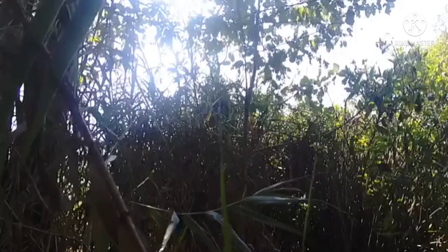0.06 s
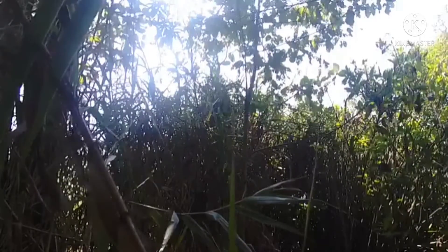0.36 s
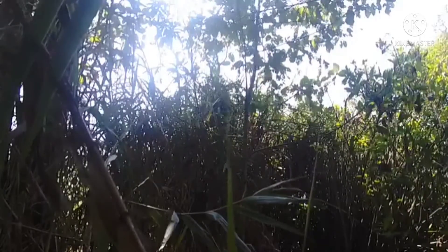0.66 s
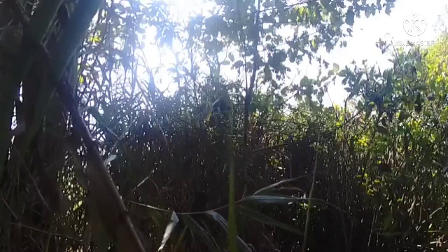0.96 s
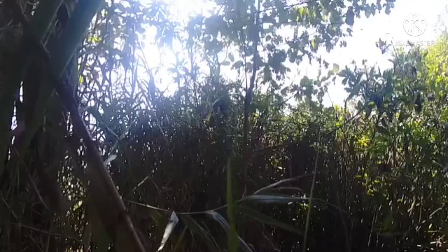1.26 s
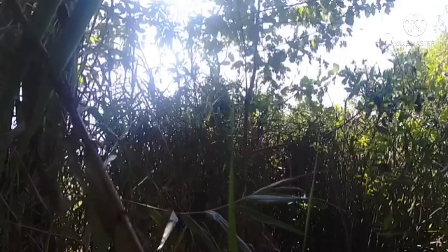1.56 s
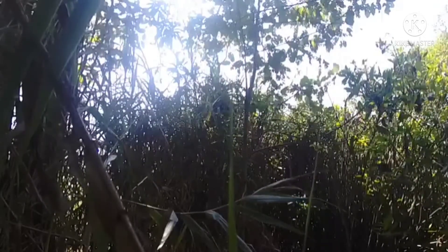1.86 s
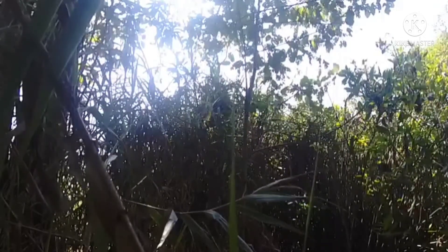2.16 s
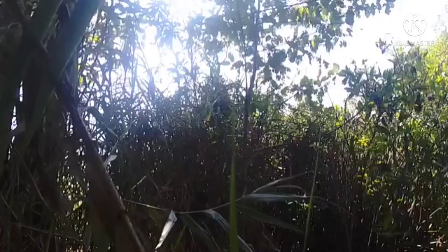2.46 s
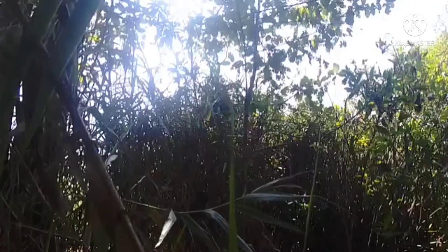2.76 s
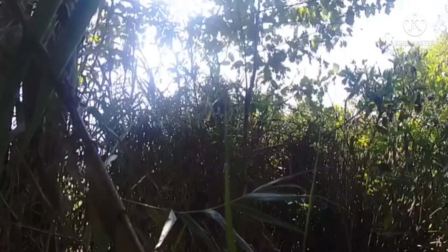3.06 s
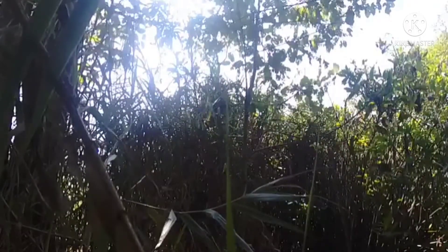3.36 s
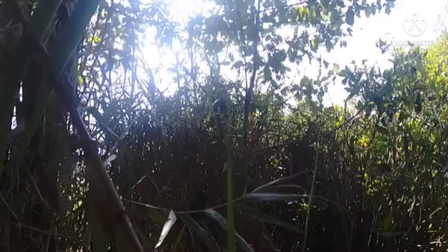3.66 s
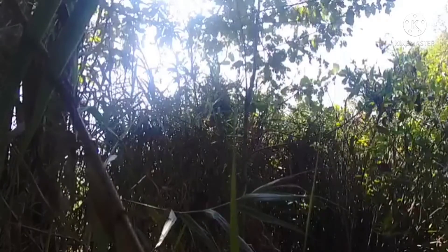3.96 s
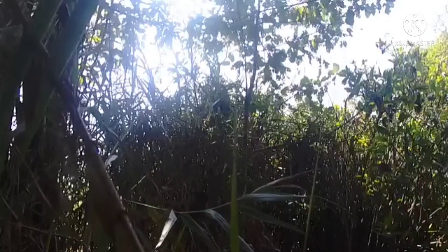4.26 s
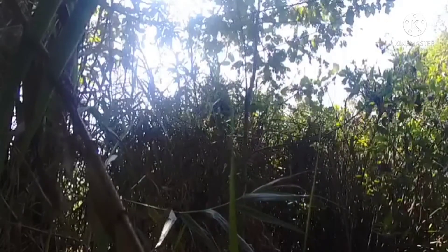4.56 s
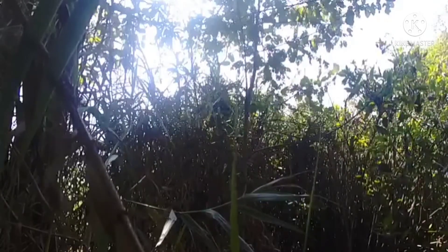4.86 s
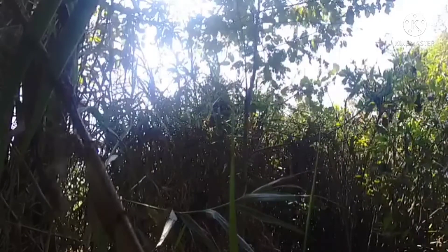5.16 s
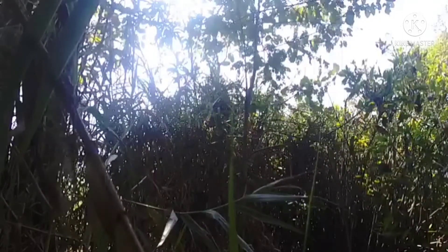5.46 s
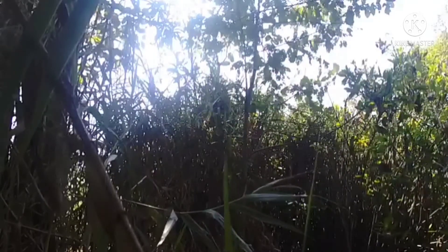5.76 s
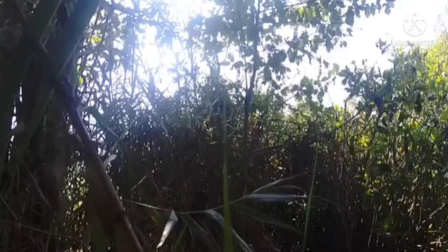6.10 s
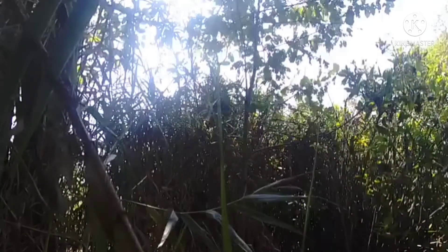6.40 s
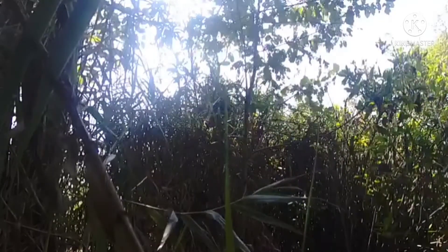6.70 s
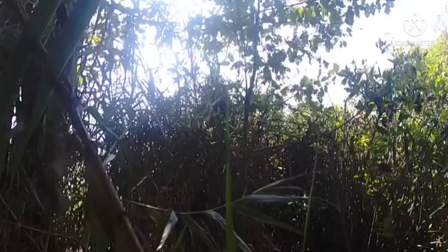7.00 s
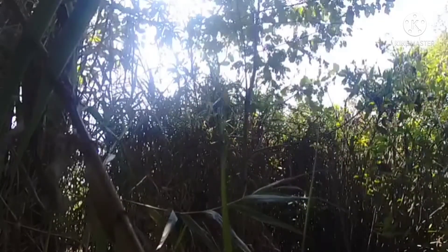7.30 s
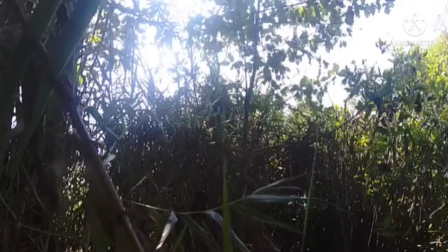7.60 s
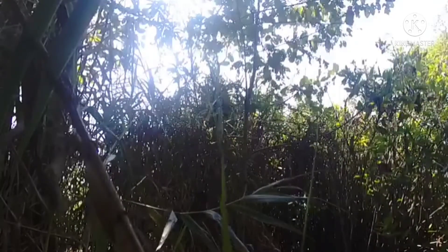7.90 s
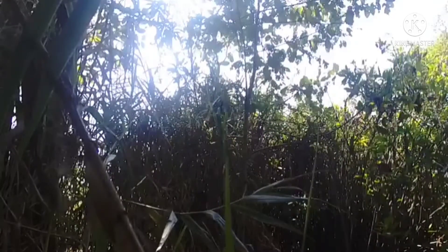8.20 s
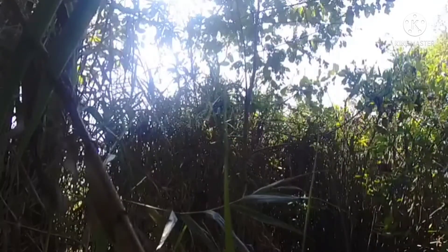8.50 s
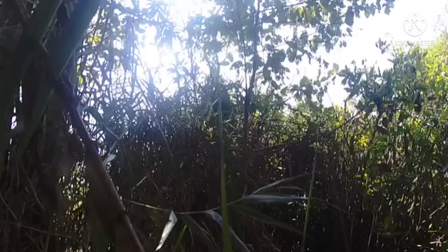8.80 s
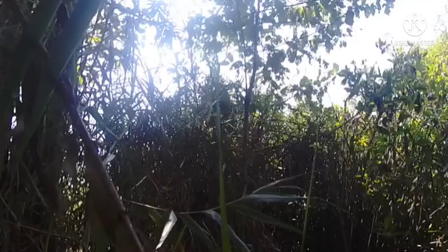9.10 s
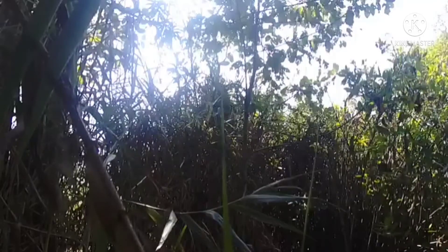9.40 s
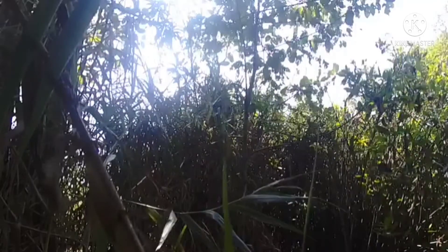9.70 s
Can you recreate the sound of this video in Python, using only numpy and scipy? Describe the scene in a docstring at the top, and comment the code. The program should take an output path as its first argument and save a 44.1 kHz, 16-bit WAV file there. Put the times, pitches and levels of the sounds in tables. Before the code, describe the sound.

Soft outdoor air and a faint, distant engine drone run throughout in a dense thicket. Thin, high insect trills and a few tiny twig ticks open the scene. From about 1 to 2.2 seconds a fairly close bird, slightly right, rattles off fast rasping notes while a second answers with short low hoots, falling slurs and clucks. A brief exchange comes near 3 seconds and another run from 4 to 4.7, as the engine swells slightly until 5. Faint far whistles and small rustles follow, clearest around 6 seconds. Harsh scolding mixed with quick falling notes bursts out from 6.5 to 7.5 seconds. The insect trills return, with one soft, far low call near 7.8. From about 8.1 to 9.8 seconds the chatter resumes, answered by a hoot and slur roughly every half second. A short scattered echo lingers around the calls.

```python
"""A dense thicket, where babblers call. One rattles off runs of rasping notes, made by a chaotically
vibrating membrane and air chopped into puffs; its mate answers with low hoots, falling slurs and clucks,
and a burst of harsh scolding comes between. Stems scatter every note, and a wash lingers around the
chatter. Farther off are thin whistles, high insect trills, small rustles, one soft low call and the
drone of an engine, over a bed of outdoor air."""
import sys
import numpy as np
from scipy import signal
from scipy.fft import rfft, irfft, next_fast_len
from scipy.io import wavfile
from scipy.ndimage import map_coordinates

SR = 44100
rng = np.random.default_rng(int(sys.argv[2]) if len(sys.argv) > 2 else 0)


def store_pcm(level_fs):
    """Save levels as 16-bit WAV."""
    pcm = np.round(np.clip(level_fs, -1, 1) * 32767).astype(np.int16)
    wavfile.write(sys.argv[1], SR, np.atleast_2d(pcm).T)


N = 434385


def amp(db):
    """Amplitude ratio of a level in decibels."""
    return 10 ** (np.asarray(db) / 20)


def unit(x):
    """Normalisation to an rms of 1."""
    return x / np.sqrt(np.mean(x ** 2) + 1e-20)


def along(points, hz):
    """Interpolation of (frequency, value) points on a logarithmic frequency axis."""
    f, v = np.transpose(points)
    return np.interp(np.log(hz + 1), np.log(f + 1), v)


def wobble(t, rate):
    """Random modulation: a spline through `rate` Gaussian values a second."""
    return map_coordinates(rng.standard_normal(int(t[-1] * rate) + 4), [t * rate + 1])


def filtered(x, response):
    """Linear filtering: the spectrum of x is multiplied by a frequency response."""
    size = x.shape[-1]
    padded = next_fast_len(size + 4096)
    return irfft(rfft(x, padded) * response(np.fft.rfftfreq(padded, 1 / SR)), padded)[..., :size]


def band(hz, centre_hz, width_hz):
    """A Gaussian band, down to 1/e at width_hz from its centre."""
    return np.exp(-((hz - centre_hz) / width_hz) ** 2)


def noise(t, spectrum):
    """Spectral shaping: white noise is coloured and scaled to an rms of 1."""
    return unit(filtered(rng.standard_normal(len(t)), lambda hz: amp(along(spectrum, hz))))


def rasp(t, spectrum, rate, depth_db):
    """Roughness: random amplitude modulation chops coloured noise into puffs."""
    return unit(noise(t, spectrum) * amp(depth_db * wobble(t, rate)))


def phase(hz):
    """Phase is the time integral of frequency."""
    return 2 * np.pi * np.cumsum(hz) / SR


def note(length, edge):
    """Time axis and raised-cosine gate of one note; length and edge in seconds."""
    t = np.arange(int((length + edge) * SR)) / SR
    return t, np.sin(np.pi / 2 * np.clip(np.minimum(t, t[-1] - t) / edge, 0, 1)) ** 2


def hold(t, start, end, rise, fall):
    """A trapezoidal envelope from 0 to 1 and back; times in seconds."""
    return np.clip(np.minimum((t - start) / rise, (end - t) / fall), 0, 1)


def add(track, start, sound):
    """Superposition of a sound on the track, from `start` seconds."""
    part = track[max(round(start * SR), 0):][:len(sound)]
    part += sound[:len(part)]


# spectral density of outdoor air: (frequency [Hz], relative level [dB])
AIR_SPECTRUM = [(10, -33.5), (24, -16.5), (45, 2.5), (62, 2), (85, -5.5), (110, -6), (150, -12),
                (260, -13.5), (520, -16.5), (1200, -23), (2500, -26.5), (4200, -30.5), (5500, -38),
                (10000, -39), (15000, -47)]
# likeness of the air at the two ears: (frequency [Hz], correlation [0 to 1])
AIR_CORRELATION = [(60, 0.99), (120, .8), (240, 0.631), (900, 0.78), (1900, 0.27), (4000, 0.18),
                   (8000, .05)]
def air(t):
    """Interaural correlation: ambient noise is alike at both ears in the bass, less so in the treble."""
    def response(hz):
        angle = np.arccos(np.clip(along(AIR_CORRELATION, hz), -1, 1)) / 2
        return amp(along(AIR_SPECTRUM, hz)) * [np.cos(angle), np.sin(angle)]
    mid, side = filtered(rng.standard_normal((2, N)), response)
    return amp(-45.5 + 0.68 * wobble(t, 2.6)) * unit(np.array([mid + side, mid - side]))


def flutter(t, centre_hz, width_hz):
    """Narrow-band noise is heard as a pitch; this one flutters and is uncorrelated between the ears."""
    carrier = filtered(rng.standard_normal((2, N)), lambda hz: band(hz, centre_hz, width_hz))
    return unit(carrier * amp(1.6 * wobble(t, 90)))


def engine(t):
    """Harmonic drone: a far engine's unsteady fundamental, louder once under load, and third harmonic."""
    idle_hz, load_db = 61.7, 9.5
    load = hold(t, start=2.84, end=5.17, rise=0.85, fall=0.14)
    turn = phase(idle_hz + 3.2 * wobble(t, 16))
    fundamental = amp(-52 + load_db * load) * np.sin(turn)
    third = amp(-63.5 + 2.6 * wobble(t, 1.7)) * np.sin(3 * turn)
    return amp(1.2 * wobble(t, 9.9)) * (fundamental + third) * np.sqrt(2)


# high trills, and a 4.5 kHz wash lingering around the runs of chatter:
# (time [s], duration [s], centre frequency [Hz], width [Hz], final level [dB])
TRILLS_AND_WASH = [(0, 0.17, 7750, 250, -63.5), (.02, 3.6, 8244, 380, -70), (1.397, 1.45, 4500, 330, -67.5),
                   (1.74, 1.6, 7800, 250, -71.5), (7.44, 2.05, 7800, 250, -69),
                   (8.218, 2, 4500, 410, -66.5), (8.242, 1.22, 8400, 378, -68)]
def trills_and_wash(t):
    """Amplitude-modulated noise bands: each swells until it stops, over a faint, steady chirr."""
    swell_db = 2
    out = amp(-75.5) * flutter(t, centre_hz=4570, width_hz=270)
    for start, length, hz, width, db in TRILLS_AND_WASH:
        to_go = np.clip(1 - (t - start) / length, 0, 1)
        gate = hold(t, start, start + length, rise=.05, fall=.05)
        out += amp(db - swell_db * to_go) * gate * flutter(t, hz, width)
    return out


# rustles, twig ticks and one soft, low, far call:
# (time [s], duration [s], centre frequency [Hz], level [dB])
FAINT_BURSTS = [(0.059, 0.018, 4960, -56), (0.094, 0.037, 1990, -52.5), (0.265, 0.012, 4730, -54.5),
                (0.767, 0.0078, 3860, -45.5), (5.065, 0.078, 3900, -60), (5.737, 0.26, 2810, -52),
                (5.851, .09, 2100, -50.5), (6.139, 0.054, 2130, -50), (7.801, .085, 1059, -51.5)]
# spectrum of each burst: (distance from the centre [octaves], relative level [dB])
BURST_SPECTRUM = [(-2, -37), (-1, -2.5), (0.5, 1), (.5, -6), (0, -15), (3, -33.5), (2, -53)]
def rustles_and_far_call():
    """Modulated noise bursts: twigs tick higher than leaves rustle, and the lowest is a soft far call."""
    out = np.zeros(N)
    for start, length, centre_hz, db in FAINT_BURSTS:
        t, gate = note(length, edge=length / 3)
        spectrum = [(centre_hz * 2 ** octaves, level) for octaves, level in BURST_SPECTRUM]
        add(out, start, amp(db) * gate * rasp(t, spectrum, rate=390, depth_db=2.0))
    return out


def syrinx(t, hz, wander_hz, shake_db, rate, overtone_db):
    """Chaotic vibration of a membrane: frequency and amplitude jump every few milliseconds."""
    turn = phase(hz + wander_hz * wobble(t, rate))
    swing = np.tanh(amp(shake_db * wobble(t, rate)) / 2)  # the swing saturates
    return unit(swing * (np.sin(turn) + amp(overtone_db) * np.sin(2 * turn)))


def throat_click():
    """Onset transient: a soft click as the throat opens."""
    t, gate = note(.0058, edge=0.0039)
    return gate * syrinx(t, hz=2725, wander_hz=220, shake_db=2.5, rate=760, overtone_db=-39.5)


# the mate's low notes: (time [s], duration [s], level [dB])
HOOT_NOTES = [(.882, 0.063, -34.5), (1.575, .027, -29), (1.906, .06, -30), (2.857, .068, -28),
              (3.588, .025, -36.5), (4.145, 0.055, -28.5), (4.573, 0.032, -30), (8.095, .059, -30.5),
              (8.599, 0.06, -30.5), (9.07, 0.064, -27.5), (9.576, .066, -28)]
def hoots():
    """Harmonic series: a low hoot whose overtones are strongest at the bottom of its pitch dip."""
    lowest_hz, dip_s, bend = 1160, 0.0355, 0.12
    accent_db, accent_s = 7.5, .014  # the first push of air and its decay time
    out = np.zeros(N)
    for start, length, db in HOOT_NOTES:
        t, gate = note(length, edge=0.003)
        height = (t / dip_s - 1) ** 2
        turn = phase(lowest_hz * (1 + bend * height) * (1 + .015 * wobble(t, 120)))
        second = amp(-15.5) * np.sin(2 * turn)
        third = amp(-15 + 3.0 * wobble(t, 65)) * np.sin(3 * turn)
        voice = unit(np.sin(turn) + amp(-13 * height) * (second + third))
        push_db = accent_db * (np.exp(-t / accent_s) - .5) + 1.7 * wobble(t, 110)
        add(out, start, amp(db + push_db) * gate * voice)
        add(out, start, amp(db - 7.5) * throat_click())
    return out


# the mate's falling notes: (time [s], duration of the glide [s], level [dB])
SLUR_NOTES = [(1.012, .054, -23), (2.032, .052, -21), (2.928, .032, -23.5), (4.012, 0.051, -20),
              (4.406, 0.045, -22.5), (4.659, 0.057, -21.5), (6.736, 0.012, -24.5), (6.828, .01, -21),
              (6.899, .01, -22.5), (6.992, 0.0092, -20.5), (7.07, .011, -23.5), (8.222, 0.053, -22.5),
              (8.715, 0.059, -21), (9.19, 0.054, -22), (9.697, .056, -20.5)]
def slurs():
    """Frequency glide: a clear tone falls through a spectral notch, levels off and fades."""
    top_hz, end_hz, attack_s = 2027, 1234, .0015
    fade_db, tail_db, tail_share = 7.5, 20.5, 0.23  # the tail dies away on the last pitch
    out = np.zeros(N)
    for start, length, db in SLUR_NOTES:
        t, gate = note(length * (1 + tail_share), edge=0.0013)
        progress = np.minimum(t / length, 1)
        tail = np.maximum(t / length - 1, 0) / tail_share
        hz = end_hz + (top_hz - end_hz) * np.cos(np.pi / 2 * progress) ** 2
        turn = phase(hz * (1 + .008 * wobble(t, 200)))
        voice = unit(np.sin(turn) + amp(-33) * np.sin(2 * turn))
        notch_db = -7.5 * band(hz, centre_hz=1440, width_hz=130)
        push_db = -fade_db * progress - tail_db * tail + 1.5 * wobble(t, 130)
        attack = 1 - np.exp(-t / attack_s)
        add(out, start, amp(db + notch_db + push_db) * attack * gate * voice)
        add(out, start - 0.012, amp(db - 20) * throat_click())
    return out


def saturated(voice, ceiling):
    """Soft limiting of the envelope holds back the strongest swings."""
    return voice / np.hypot(1, abs(signal.hilbert(voice)) / ceiling)


# rasping notes: (time [s], duration [s], frequency [Hz], level [dB])
CHATTER_NOTES = [(1.039, .045, 2816, -24), (1.135, .031, 2720, -18.5), (1.233, .008, 2740, -20),
                 (1.428, .02, 2737, -19.5), (1.51, .039, 2706, -22), (1.617, .041, 2790, -22.5),
                 (1.704, .037, 2714, -21), (1.829, .031, 2750, -19.5), (1.932, .039, 2730, -23),
                 (2.014, .034, 2723, -22), (2.108, .041, 2730, -22), (2.197, 0.036, 2687, -21.5),
                 (2.924, .007, 2810, -26.5), (2.938, 0.0233, 2750, -27.5), (4.057, 0.048, 2910, -25),
                 (4.117, 0.0074, 2715, -22), (4.21, 0.0051, 2770, -25), (4.392, .006, 2770, -29),
                 (4.431, .02, 2820, -29.5), (4.459, 0.021, 2875, -23.5), (4.615, 0.035, 2887, -22.5),
                 (4.692, .043, 2800, -27), (8.256, .042, 2845, -25.5), (8.353, 0.03, 2790, -20),
                 (8.461, 0.029, 2804, -21.5), (8.579, 0.023, 2778, -22), (8.672, .033, 2797, -21),
                 (8.76, 0.045, 2830, -25.5), (8.847, .032, 2843, -21.5), (8.943, .032, 2817, -20.5),
                 (9.131, .04, 2862, -21.5), (9.217, 0.037, 2840, -26), (9.314, .032, 2775, -19),
                 (9.658, .034, 2846, -19), (9.747, .03, 2785, -23)]
# colour of the rasp, with peaks and notches from a ground reflection:
# (frequency [Hz], relative level [dB])
RASP_SPECTRUM = [(300, -78.5), (440, -41.5), (495, -13), (600, -16.5), (1100, -17), (1430, -21.5),
                 (1750, -10), (2150, -2.5), (2310, -12), (2500, -7), (2900, -11.5), (3300, -13),
                 (3850, -27), (5200, -51), (14000, -76)]
def chatter():
    """Tone plus noise: a rough tone in a skirt of rasp swells, then sags as the pressure drops."""
    full_rise_db, rise_share, sag_db = 15.5, 0.29, 1.5
    snap_s, usual_db = .015, -23.5  # notes shorter than snap_s burst out with no swell
    out = np.zeros(N)
    for start, length, hz, db in CHATTER_NOTES:
        t, gate = note(length, edge=0.0037)
        rise_db = full_rise_db * np.clip(length / snap_s - 1, 0, 1)
        to_rise = np.clip(1 - t / (rise_share * length), 0, 1)
        swell = amp(-rise_db * to_rise - sag_db * (t / t[-1]) ** 4)
        tone = syrinx(t, hz, wander_hz=107, shake_db=5, rate=390, overtone_db=-52)
        # a faint upper resonance of the throat
        ring = unit(filtered(rng.standard_normal(len(t)), lambda f: band(f, 5810, width_hz=200)))
        puffs = rasp(t, RASP_SPECTRUM, rate=500, depth_db=1.0)
        puffs_db = -8.5 - 1.1 * (db - usual_db)  # the weaker the note, the more of it is rasp
        voice = saturated(unit(tone + amp(puffs_db) * puffs + amp(-43) * ring), ceiling=4.1)
        add(out, start, amp(db) * gate * unit(swell * voice))
    return out


# breaks in the mate's voice: (time [s], level [dB])
CLUCK_NOTES = [(1.581, -33.5), (2.075, -32), (2.959, -29.5), (3.592, -26), (4.58, -27.5), (8.602, -39.5)]
# spectrum of a cluck: (frequency [Hz], relative level [dB])
CLUCK_SPECTRUM = [(380, -44.5), (480, -0.5), (680, -2), (950, -13), (1250, 4), (1700, -21.5), (2800, -22),
                  (4500, -39.5), (14000, -78.5)]
def clucks():
    """Spectral shaping: each cluck is a short, low, hollow burst of noise."""
    out = np.zeros(N)
    for start, db in CLUCK_NOTES:
        t, gate = note(0.0089, edge=0.00073)
        add(out, start, amp(db) * gate * noise(t, CLUCK_SPECTRUM))
    return out


# far birds: (time [s], duration [s], first frequency [Hz], last frequency [Hz], level [dB])
FAR_WHISTLES = [(1.792, 0.051, 3850, 3870, -56.5), (3.006, 0.25, 4135, 4125, -57),
                (3.41, 0.18, 3380, 3040, -54), (4.368, 0.31, 4120, 4067, -58),
                (5.082, 0.29, 3990, 4020, -60.5), (5.704, 0.13, 3580, 3140, -49.5),
                (5.87, .15, 3124, 3420, -46.5), (6.04, 0.099, 3270, 3400, -59)]
def whistles():
    """Frequency modulation of a pure tone: it drifts, and the wider its glide, the more it quavers."""
    steady_quaver_hz, quaver_per_glide, drift_hz = 2, .4, 22
    out = np.zeros(N)
    for start, length, first_hz, last_hz, db in FAR_WHISTLES:
        t, gate = note(length, edge=length / 8)
        quaver_hz = steady_quaver_hz + quaver_per_glide * abs(last_hz - first_hz)
        wander_hz = quaver_hz * wobble(t, 300) + drift_hz * wobble(t, 14)
        tone = np.sin(phase(np.linspace(first_hz, last_hz, len(t)) + wander_hz))
        add(out, start - length / 16, amp(db + 2.2 * wobble(t, 70)) * gate * tone)
    return out


# harsh notes: (time [s], duration [s], frequency [Hz], level [dB])
SCOLD_NOTES = [(6.532, 0.056, 2920, -29), (6.58, 0.01, 2730, -24), (6.615, .034, 3150, -31.5),
               (6.646, .017, 2830, -22.5), (6.665, 0.03, 2630, -24), (6.741, 0.02, 2633, -23.5),
               (6.791, .016, 2700, -24.5), (6.832, .019, 2630, -23.5), (6.851, 0.036, 2707, -23.5),
               (6.904, 0.0079, 2770, -26.5), (6.917, .024, 2636, -23.5), (6.997, .019, 2610, -25.5),
               (7.074, 0.0078, 2710, -26), (7.303, 0.053, 2713, -24.5), (7.419, 0.024, 2737, -24.5)]
# colour of their noise: (frequency [Hz], relative level [dB])
SCOLD_SPECTRUM = [(380, -59), (490, -12), (800, -12), (1030, -17), (1200, -19.5), (1650, -11.5),
                  (2120, 0.5), (2330, -1), (2700, 2.5), (3100, -13), (3500, -19), (4200, -43.5),
                  (5200, -42), (14000, -74)]
# hiss of the highest notes: (frequency [Hz], relative level [dB])
HISS_SPECTRUM = [(1500, -52.5), (2900, 5.5), (3500, 10), (4200, 2), (4800, -19), (6000, -44), (14000, -74)]
def scolding():
    """Aperiodic voicing: noise outweighs the tone in these abrupt notes, and the highest also hiss."""
    out = np.zeros(N)
    for start, length, hz, db in SCOLD_NOTES:
        t, gate = note(length, edge=0.0012)
        tone = amp(-2.0) * syrinx(t, hz, wander_hz=187, shake_db=8.5, rate=720, overtone_db=-49.0)
        hiss = amp(min((hz - 2930) / 10, 2)) * noise(t, HISS_SPECTRUM)
        breath = rasp(t, SCOLD_SPECTRUM, rate=600, depth_db=0)
        voice = saturated(unit(tone + hiss + breath), ceiling=4.7)
        sag = amp(-7 * (t / t[-1]) ** 4)
        add(out, start, amp(db) * gate * unit(sag * voice))
    return out


# reverberation of the deep thicket: (frequency [Hz], time to decay by 60 dB [s])
THICKET_T60 = [(300, 0.46), (1200, 0.36), (2800, 0.31), (4000, 0.76), (8000, 0.28)]
def in_thicket(x, near_db, near_t60, far_db):
    """Scattering: close stems add quick echoes to the direct sound, and the deeper thicket rings on."""
    hz, frame_s, spectra = signal.stft(rng.standard_normal((2, SR // 2)), SR, nperseg=256)
    decay = amp(-60 * frame_s / along(THICKET_T60, hz)[:, None])
    tail = signal.istft(spectra * decay, SR, nperseg=256)[1]
    t = np.arange(tail.shape[1]) / SR
    tail = (tail + tail[::-1]) * (1 - np.exp(-t / 0.013))  # builds up alike in both channels
    stems = rng.standard_normal(len(t)) + 0.45 * rng.standard_normal(tail.shape)
    stems *= amp(-60 * t / near_t60) * (t > .003)
    near = amp(near_db) * stems / np.linalg.norm(stems[0])
    far = amp(far_db) * tail / np.linalg.norm(tail[0])
    return x + signal.fftconvolve(x[None], near + far, axes=1)[:, :N]


def placed(x, pan_db):
    """Interaural level difference (left minus right) sets a source to one side."""
    return x * amp([[pan_db / 2], [-pan_db / 2]])


def scene():
    """Superposition of all sources: the chatterer a little to the right, the others nearly ahead."""
    t = np.arange(N) / SR
    rattle, scolds = chatter(), scolding()
    mate = hoots() + slurs() + clucks()
    distant = whistles() + rustles_and_far_call()
    out = placed(in_thicket(rattle, near_db=-8.0, near_t60=0.13, far_db=-13.5), pan_db=-2.0)
    out += placed(in_thicket(scolds, near_db=-8.0, near_t60=0.096, far_db=-14.5), pan_db=-1.7)
    out += placed(in_thicket(mate, near_db=-10, near_t60=0.11, far_db=-16), pan_db=-1)
    out += in_thicket(distant, near_db=-7.5, near_t60=0.16, far_db=-9.5)
    out += air(t)
    out += amp(-91) * flutter(t, centre_hz=14804, width_hz=6)  # a faint high whine
    return out + engine(t) + trills_and_wash(t)


def record(dry):
    """Band limiting: an ideal low-pass filter keeps nothing above its cutoff."""
    cutoff_hz = 15150
    return filtered(dry, lambda hz: hz < cutoff_hz)


dry = scene()
out = record(dry)
store_pcm(out)
```